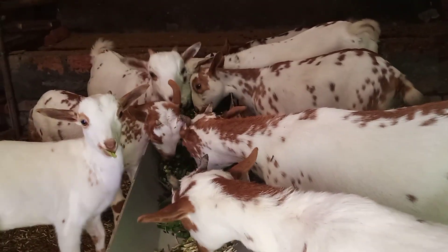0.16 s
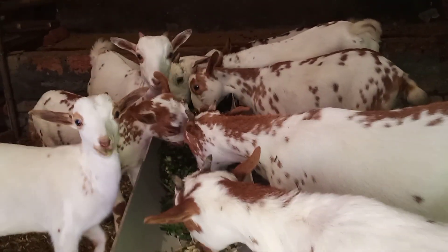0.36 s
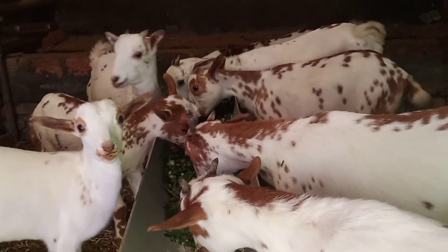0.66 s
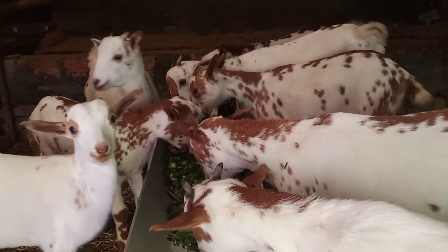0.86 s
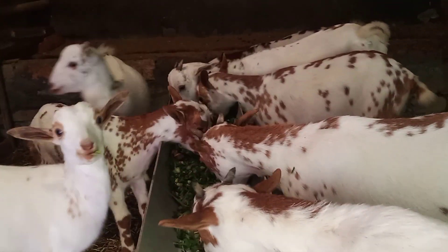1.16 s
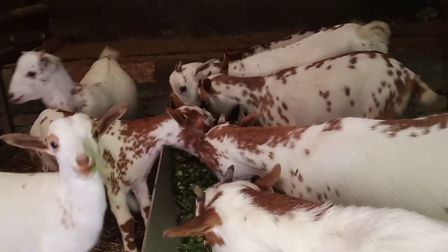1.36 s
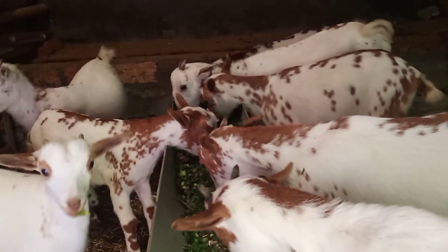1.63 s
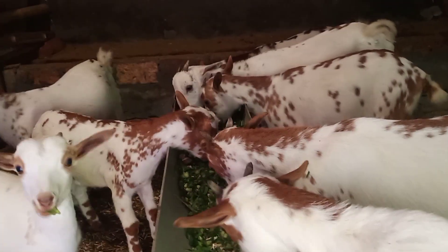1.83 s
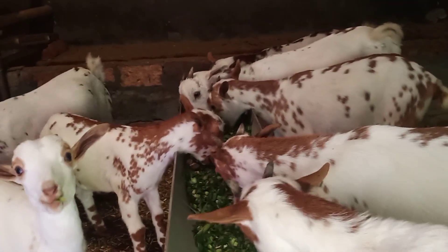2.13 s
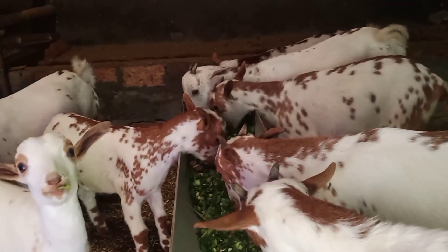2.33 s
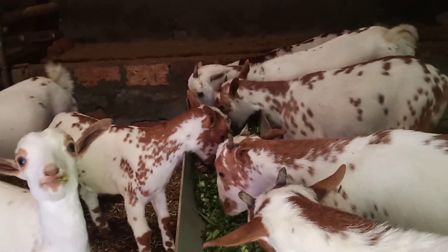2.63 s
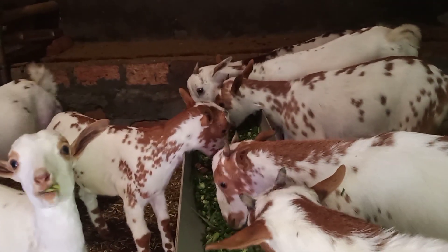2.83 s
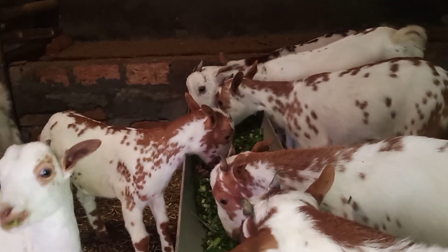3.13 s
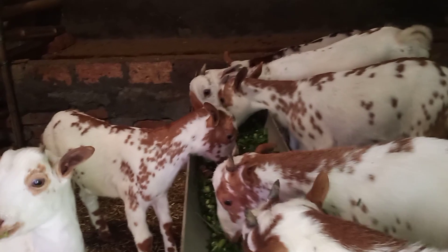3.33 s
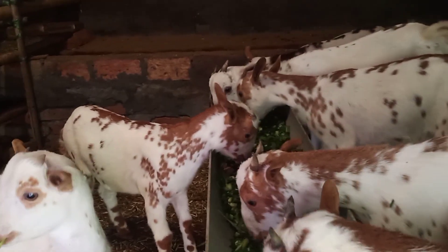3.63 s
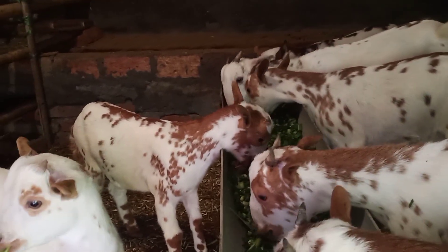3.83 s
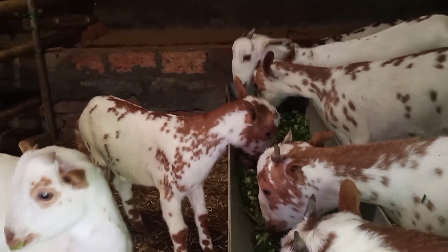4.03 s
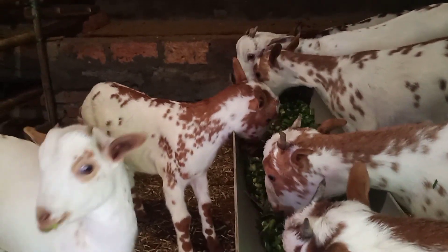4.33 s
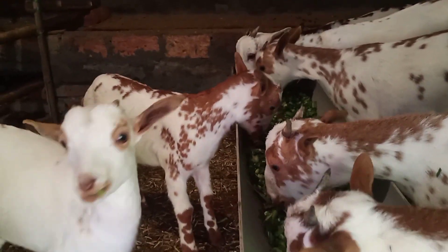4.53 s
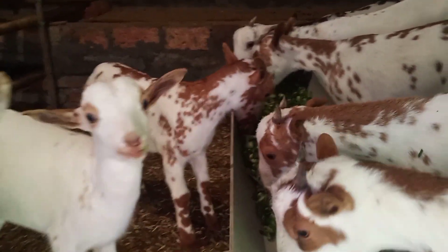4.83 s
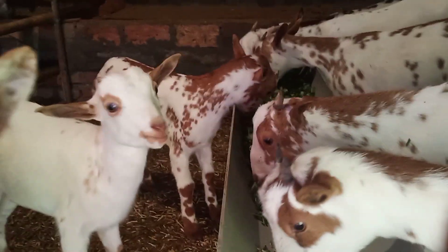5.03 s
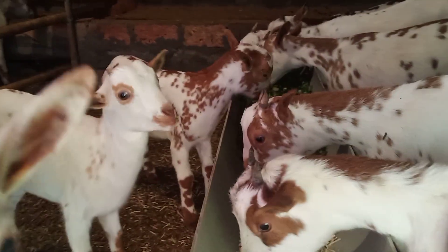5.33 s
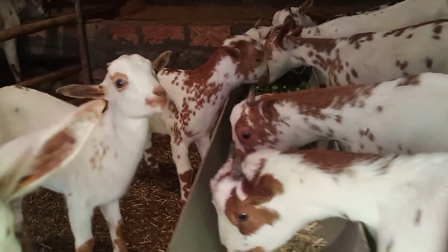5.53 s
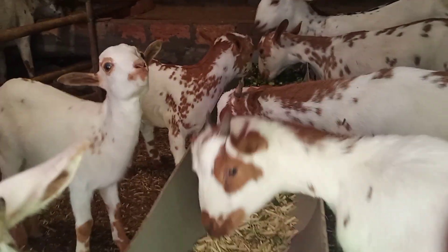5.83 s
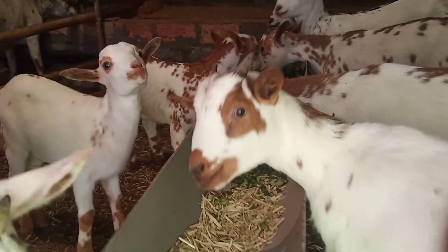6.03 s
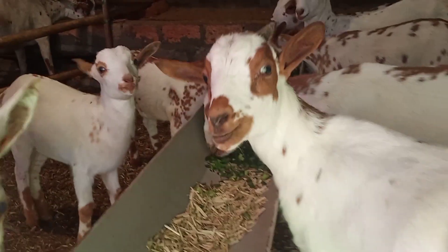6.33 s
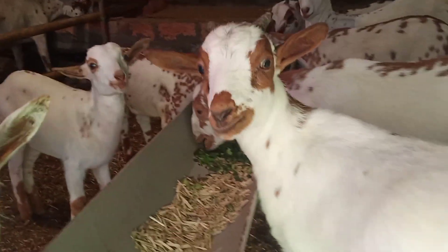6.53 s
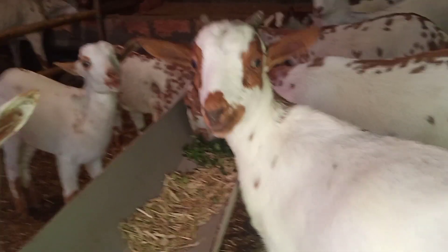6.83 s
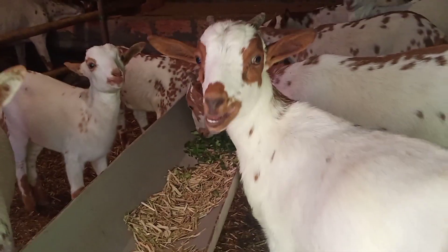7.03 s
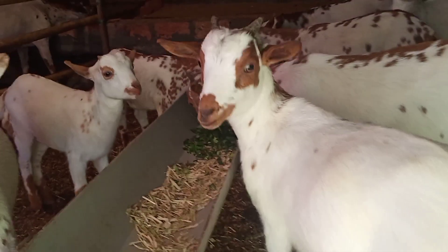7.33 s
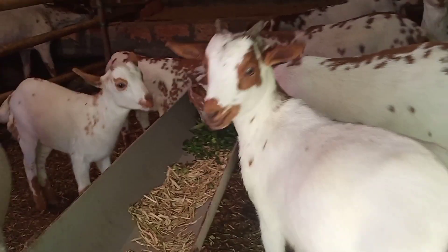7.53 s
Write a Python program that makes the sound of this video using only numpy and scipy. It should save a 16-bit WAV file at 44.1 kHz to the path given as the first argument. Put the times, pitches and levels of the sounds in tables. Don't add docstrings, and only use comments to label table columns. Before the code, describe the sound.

In a brick shed, goats feed at a metal trough. Near sparrows whistle falling chirps throughout, with hoarser and fainter ones between. Fodder hisses and snaps, sharpest near the start, while muzzles and horns scrape and knock the sheet metal in short uneven bouts. A tiny grunt opens it and soft hooves thud. A stereo phone hears feeding close and birds roomy, its noise reduction leaving the background patchy.

```python
import sys
import numpy as np
from scipy import signal
from scipy.fft import rfft, irfft, next_fast_len
from scipy.io import wavfile
from scipy.ndimage import uniform_filter1d

SR = 44100
rng = np.random.default_rng(int(sys.argv[2]) if len(sys.argv) > 2 else 0)


def master_out(mix):
    frames = np.transpose(np.atleast_2d(mix))
    ceiling = np.clip(frames, -1, 1)
    pcm = np.round(ceiling * 32767).astype(np.int16)
    wavfile.write(sys.argv[1], SR, pcm)


def level_to_linear(level):
    exponent = np.asarray(level, float) / 20
    return 10 ** exponent


N = 338247
T = np.arange(N) / SR

# f/Hz, level/dB per Hz
MURMUR_COLOUR = [(18, -47), (30, -5.5), (562, -3), (2140, -14.5), (4110, -7), (4930, -5.5), (6410, -6.5),
                 (9490, -29.5), (15600, -9)]
MURMUR_DB = -81.5
PATCHY_DB = 1.6
# t/s, level/dB
DIPS = [
    (2.23, -10),
    (2.83, -15),
    (3.75, -7.5),
    (4.47, -3),
    (5.69, -6),
    (5.92, -9),
    (6.53, -10.5),
    (7.6, -6.5),
]
DIP_S = 0.11

# start t/s, knee t/s, start f/Hz, knee f/Hz, level/dB
NEAR_CHIRPS = [(-.045, .125, 5300, 4226, -39), (.52, .69, 5304, 4000, -42), (.85, .98, 5300, 4063, -43),
               (1.38, 1.57, 5190, 4420, -43), (1.72, 1.85, 5206, 4350, -44), (2.28, 2.48, 5300, 4120, -40),
               (2.87, 3.08, 4943, 4166, -42), (3.26, 3.37, 4803, 4433, -44.5),
               (3.96, 4.03, 4620, 4283, -40.5), (4.2, 4.33, 5130, 4254, -43),
               (4.85, 5.04, 5034, 3954, -43.5), (5.295, 5.37, 4280, 4050, -47),
               (6.03, 6.18, 4980, 4260, -43)]
# start t/s, knee t/s, start f/Hz, knee f/Hz, level/dB
HOARSE_CHIRPS = [
    (1.95, 2.08, 4014, 3762, -47),
    (2.88, 3.12, 3859, 3710, -49.5),
    (3.43, 3.52, 4303, 3800, -47),
    (5.23, 5.36, 4064, 3662, -47.5),
    (5.71, 5.79, 4137, 4225, -52.5),
    (5.93, 6.07, 4404, 4005, -49),
    (6.6, 6.8, 4220, 3600, -56.5),
    (7.04, 7.14, 4014, 4130, -53),
    (7.63, 7.75, 3920, 4120, -54),
]
# start t/s, knee t/s, start f/Hz, knee f/Hz, level/dB
FAR_CHIRPS = [
    (.28, .45, 4070, 4032, -44),
    (1.45, 1.715, 3830, 3590, -50),
    (2.24, 2.33, 4232, 4284, -44),
    (4.09, 4.245, 4036, 3760, -49.5),
    (5.44, 5.605, 3600, 3400, -48),
]
# start t/s, end t/s, start f/Hz, end f/Hz, level/dB
PEEPS = [
    (3.86, 3.98, 5320, 5120, -61),
    (5.23, 5.33, 5200, 5130, -56.5),
    (6.6, 6.71, 4437, 4340, -54.5),
]
# share of the glide time held on top, share of the glide done midway after it, swell level/dB,
# share of the fall done in the drop, end f/Hz, drop level/dB, end level/dB
NEAR_SONG = (0.2671, 0.65, 7.5, 0.6, 2520, 2, -14.5)
HOARSE_SONG = (0.19, 0.5, 4, 0.3964, 2400.5, 0.5, -23)
FAR_SONG = (0.21, 0.51, 1, 0.52, 2400.5, -1.5, -17)
# f/Hz, level/dB
OCTAVE = [(5000, -18.5), (6200, -8.5), (7000, -22), (8000, -38), (10500, -38.5)]
ATTACK_S, ATTACK_DB, DROP_S, TAIL_S = .025, -15.5, .027, .05
SCOOP = .025
FALL_HZ = 1707
NEAR_BURR, HOARSE_BURR, FAR_BURR = 0.066, 0.35, .025

# peak t/s, rustle level/dB, rise t/s, fade t/s
RUSTLES = [(.03, -75, .1, .45), (.33, -64, 0.074, 0.091), (.44, -40.5, 0.01, 0.1), (.72, -54, 0.086, 0.18),
           (1.08, -57.5, 0.069, 1), (1.2, -59, 0.13, 0.3), (1.63, -70.5, .1, 0.16), (1.75, -67, 0.16, .35),
           (2.03, -69, 0.075, 0.29), (2.4, -62, 0.051, 0.081), (2.53, -74.5, 0.087, .19),
           (2.75, -74.5, .17, 0.079), (3.14, -59.5, 0.051, 0.2), (3.5, -75, 0.17, 0.93),
           (3.65, -69, 0.24, 0.086), (3.89, -73.5, .2, 2.6), (4.22, -64, 0.13, 0.33),
           (4.55, -68, 0.088, 0.083), (4.75, -69, 0.43, 0.11), (4.93, -61.5, 0.13, 0.075),
           (5.05, -59.5, 0.037, 0.23), (5.41, -64.5, 0.071, 0.099), (5.6, -79.5, 0.33, 1.5),
           (6.08, -59, 0.054, 0.14), (6.4, -66, 0.15, .2), (6.83, -58.5, 0.085, 0.062),
           (6.98, -71.5, 0.047, 0.17), (7.08, -69, 0.3, 0.32), (7.31, -60.5, 0.065, 0.21),
           (7.51, -70, 0.11, .1)]
# f/Hz, level/dB per Hz
RUSTLE_COLOUR = [(710, -30.5), (1200, -18.5), (1490, -25), (2460, -12), (3400, -9), (3950, -7),
                 (5110, -5.5), (6610, -3), (8110, -15.5), (15600, -5)]
# t/s, peak level/dB, burst t/s
SNAPS = [(0.292, -50, 0.01), (0.4293, -38.5, 0.017), (0.4549, -37.5, 0.047), (2.634, -59, 0.022),
         (3.3884, -51.5, 0.037), (3.645, -62, 0.0087), (3.8706, -68.5, 0.019), (4.501, -72, 0.017),
         (4.568, -50, 0.0087), (6.798, -48.5, 0.0092), (7.0175, -43.5, 0.033), (7.3036, -63, 0.042),
         (7.5003, -67, 0.034)]
FADE_DB = -32.5

# t/s, pitch f/Hz, level/dB
GRUNT = [
    (0.05, 150.7, -78.5),
    (0.126, 175.3, -66),
    (0.21, 159, -79.5),
]

# peak t/s, scrape level/dB, rise t/s, fade t/s
SCRAPES = [(.252, -39.5, .09, 0.25), (.758, -39.5, .135, 0.33), (1.28, -37.5, 0.093, 0.07),
           (1.908, -41, 0.07, 0.1), (2.65, -38.5, 0.084, 0.068), (3.062, -60, .11, 0.057),
           (3.444, -38.5, 0.055, 0.099), (3.882, -57, .042, 0.16), (4.28, -64, .08, 0.1),
           (4.524, -35.5, 0.028, 0.22), (4.916, -40, .045, 0.28), (5.396, -35.5, 0.08, 0.1),
           (6.1, -69, 0.12, 0.029), (6.828, -40.5, 0.091, 0.062), (7.038, -44.5, 0.017, 0.099)]
# f/Hz, level/dB per Hz
SCRAPE_COLOUR = [(120, -63.5), (200, -26.5), (657, -1), (741, 1), (1160, -3), (1730, -20), (3580, -20),
                 (4970, -28), (5770, -32.5), (7000, -40.5), (9100, -74), (15400, -120)]
# f/Hz, level/dB, 60 dB decay t/s
TROUGH_MODES = [(500, -23.5, 1.6), (796, -5, 0.26), (896, 0.5, 0.94), (987, 8.5, 0.072),
                (1615, -38.5, 0.45), (1850, -29, 4.6)]
# t/s, peak level/dB, ring f/Hz
HORN_BLOWS = [(.159, -32, 900), (.199, -38.5, 525.4), (.235, -33, 1475), (.244, -31, 710), (.429, -31, 800),
              (.446, -24.5, 1020), (.685, -27, 816), (.756, -24.5, 947), (.896, -36, 604),
              (.943, -45.5, 581), (1.275, -23, 763), (1.851, -35.5, 783), (1.919, -23, 900),
              (2.034, -35.5, 1778), (2.619, -36.5, 530), (3.392, -35.5, 735), (3.459, -37, 758),
              (3.654, -56.5, 472), (4.565, -26.5, 615.4), (4.954, -33.5, 916), (4.989, -36, 491),
              (5.379, -34, 1139), (5.748, -57, 646), (6.099, -53, 628), (6.4, -50.5, 431),
              (6.759, -34, 813), (6.815, -27, 801.5), (6.869, -31, 661), (7.02, -38, 963),
              (7.059, -41, 351.7)]
CHATTER_S, CHATTER_DB, CHATTER_HZ, CLIMB = .045, 4.5, 477, 1.17

# t/s, peak level/dB
HOOF_THUDS = [
    (0.884, -53.5),
    (2.461, -65),
    (3.059, -69),
    (3.207, -64),
    (4.901, -60.5),
    (6.951, -76.5),
    (7.268, -70.5),
]

# f/Hz, level/dB
LEFT_PORT = [(30, 4), (4700, 3), (5050, 3), (5400, -1), (15600, 3), (15800, -38)]
# f/Hz, level/dB
RIGHT_PORT = [(30, 5.5), (4700, 1.5), (5050, -2), (5400, 3.5), (8000, 2.5), (11000, -6.5), (15600, -21.5),
              (15800, -62.5)]
PORT_LAG = 22
# f/Hz, level/dB
HUSH = [(30, -125), (1000, -112), (3000, -100), (5000, -98), (8000, -100), (11000, -104), (16000, -120)]


def colour(x, points):
    hz, db = np.transpose(points)
    n = x.shape[-1]
    size = next_fast_len(n)
    bins = np.maximum(np.arange(size // 2 + 1) * SR / size, 1)
    gain = level_to_linear(np.interp(np.log(bins), np.log(hz), db))
    return irfft(rfft(x, size) * gain, size)[..., :n]


def unit(x):
    return x / np.sqrt(np.mean(x ** 2))


def walk(rate):
    k = int(SR / rate)
    held = np.repeat(rng.standard_normal(N // k + 1), k)
    slewed = uniform_filter1d(uniform_filter1d(held, k), k)
    return unit(slewed[:N])


def grains(rate, spread_db):
    struck = rng.random(N) < rate / SR
    return struck * rng.standard_normal(N) * level_to_linear(spread_db * rng.exponential(size=N))


def played(tables, edge_s):
    rows = np.vstack(tables)
    on = sum((T >= t[0][0]) & (T <= t[-1][0]) for t in tables)
    columns = [np.interp(T, rows[:, 0], c) for c in rows.T[1:]]
    return columns, uniform_filter1d(1. * (on > 0), int(edge_s * SR))


def swells(rows, entry_db, lead, floor_db):
    t = T[::64]
    each = []
    for s, db, rise, fade in rows:
        times = [s - (1 + lead) * rise, s - rise, s, s + 2 * fade]
        levels = [db + 2 * entry_db, db + entry_db, db, db + 2 * FADE_DB]
        each.append(np.interp(t, times, levels, floor_db, floor_db))
    return np.interp(T, t, np.maximum(np.max(each, axis=0), floor_db))


def room(x, t60, wet_db):
    t = np.arange(int(.5 * SR)) / SR
    mid, side = rng.standard_normal((2, len(t))) * level_to_linear(-60 * t / t60) * (t > .004)
    side = colour(side, [(30, -24.5), (200, -19.5), (700, -4.5), (16000, 2.5)])
    tails = np.array([mid + side, mid - side]) * level_to_linear(wet_db) / np.sqrt(2 * np.sum(mid ** 2))
    tails[0, PORT_LAG] += 1
    tails[1, 0] += 1
    return signal.fftconvolve(x[None], tails, axes=1)[:, :N]


def shed():
    mid, side = colour(rng.standard_normal((2, N)), MURMUR_COLOUR)
    side = colour(side, [(30, -16.0), (150, -9.5), (500, -5), (16000, 1.0)])
    dips = sum(db * np.maximum(1 - np.abs(T - s) / DIP_S, 0) for s, db in DIPS)
    patchy = level_to_linear(MURMUR_DB + 5.5 + PATCHY_DB * walk(8.3) + dips)
    return patchy * np.array([mid + side, mid - side]) / np.std(mid)


def chirp(rows, song):
    hold, bow, swell_db, drop, end_hz, drop_db, end_db = song
    out = []
    for start, knee, top_hz, knee_hz, db in rows:
        held = start + ATTACK_S + hold * (knee - start - ATTACK_S)
        deep = (knee_hz - end_hz) / FALL_HZ
        out.append([
            (start, top_hz * (1 - SCOOP), db - swell_db + ATTACK_DB),
            (start + ATTACK_S, top_hz, db - swell_db),
            (held, top_hz, db - swell_db),
            ((held + knee) / 2, top_hz + bow * (knee_hz - top_hz), db - 0.19 * swell_db),
            (knee, knee_hz, db),
            (knee + deep * DROP_S, knee_hz + drop * (end_hz - knee_hz), db + drop_db),
            (knee + deep * (DROP_S + TAIL_S), end_hz, db + end_db)])
    return out


def sparrow(tables, burr, burr_hz, wobble):
    (hz, db), on = played(tables, 0.017)
    hoarse = np.interp(hz, [2705, 3600, 4800, 5300], [9.0, 1, 1.2, 4])
    flutter = 2 * np.pi * np.cumsum(burr_hz * (1 + 0.22 * walk(60))) / SR
    phase = 2 * np.pi * np.cumsum(hz * (1 + wobble * hoarse * walk(250))) / SR
    octave = level_to_linear(np.interp(2 * hz, *np.transpose(OCTAVE))) * np.sin(2 * phase)
    lines = np.sin(phase) + 2 * burr * np.sin(phase + flutter) + 0.14 * burr * np.sin(phase - flutter)
    breath = level_to_linear(db + 1.92 * walk(70) + 1.5 * walk(300))
    return np.sqrt(2) * on * breath * (lines + octave)


def rafters():
    peeps = [rows[:5] for rows in chirp(PEEPS, FAR_SONG)]
    near = sparrow(chirp(NEAR_CHIRPS, NEAR_SONG), NEAR_BURR, 320, 0.0047)
    hoarse = sparrow(chirp(HOARSE_CHIRPS, HOARSE_SONG), HOARSE_BURR, 320, .004)
    far = sparrow(sorted(chirp(FAR_CHIRPS, FAR_SONG) + peeps), FAR_BURR, 330, 0.0024)
    return near + hoarse + far


def fodder():
    db = swells(RUSTLES, entry_db=-18, lead=1, floor_db=-98) + 1.5 * walk(70)
    crackle = unit(grains(2500, 2.5))
    hiss = unit(colour(rng.standard_normal(N) + 3.6 * crackle, RUSTLE_COLOUR))
    thin = colour(hiss, [(7000, -31), (10500, -24), (14500, -3.5)])
    fullness = level_to_linear(0.21 * np.minimum(db + 52.5, 0))
    rustle = level_to_linear(db + 6.0) * (thin + fullness * (hiss - thin))
    burst = sum(level_to_linear(peak) * (T > s) * np.exp(-np.abs(T - s) / max(d, .003)) for s, peak, d in SNAPS)
    crack = colour(rng.standard_normal(N), [(500, -14.5), (2000, -1.0), (4000, 9.0), (7000, -7.5),
                                            (10000, -13.5), (15000, -22.5)])
    return rustle + level_to_linear(-4.5) * burst * unit(crack)


def goat():
    (hz, db), on = played([GRUNT], .03)
    phase = 2 * np.pi * np.cumsum(hz * (1 + .01 * walk(60))) / SR
    return on * level_to_linear(db) * (np.sin(phase) + 0.76 * np.sin(2 * phase) + .3 * np.sin(3 * phase))


def knocks(blows):
    out = np.zeros(N + SR)
    t = np.arange(SR // 3) / SR
    for (s, db, f), (a, b, c) in zip(blows, rng.random((len(blows), 3))):
        pair = np.sin(2 * np.pi * f * t) + 0.75 * np.sin(2 * np.pi * f * (1.05 + 0.054 * a) * t)
        upper = 0.38 * np.sin(2 * np.pi * f * (1.4 + .5 * b) * t) * level_to_linear(-60 * t / 0.038)
        t60 = (.1 + .08 * c) * min(1, 900 / f)
        attack = np.minimum(t / 0.0031, 1)
        out[int(s * SR):][:len(t)] += level_to_linear(db) * attack * (pair * level_to_linear(-60 * t / t60) + upper)
    return out[:N]


def chatter(scrape_db, count):
    step = np.arange(count)
    rows = []
    for (s, _, rise, _), (a, b) in zip(SCRAPES, rng.standard_normal((len(SCRAPES), 2, count))):
        at = s - .7 * rise + CHATTER_S * (step + .2 * a)
        level = np.interp(at, T, scrape_db) + CHATTER_DB + 4.6 * b
        rows += zip(at, level, CHATTER_HZ * CLIMB ** (step + .6 * a))
    return rows


def trough():
    db = swells(SCRAPES, entry_db=-13.5, lead=0.1, floor_db=-120)
    ticks = level_to_linear(db) * unit(np.clip(unit(grains(250, 3.0)), -24, 24))
    t = np.arange(SR // 3) / SR
    ring = sum(level_to_linear(g) * np.sin(2 * np.pi * f * t) * level_to_linear(-60 * t / min(d, .25)) for f, g, d in TROUGH_MODES)
    modes = signal.fftconvolve(ticks, ring / np.sqrt(np.sum(ring ** 2)))[:N]
    stutter = level_to_linear(8.3 * np.tanh(walk(80)))
    rub = unit(colour(stutter * rng.standard_normal(N), SCRAPE_COLOUR))
    blows = knocks(HORN_BLOWS + chatter(db, count=4))
    sheet = level_to_linear(-11.0) * modes + level_to_linear(db - 6.0) * rub + level_to_linear(-7.0) * blows
    return colour(sheet, [(30, -49), (200, -11.5), (320, -2.0), (16000, 1.5)])


def hooves():
    push = sum(level_to_linear(db) * np.maximum(T - s, 0) / 0.041 * np.exp(1 - np.abs(T - s) / 0.019)
               for s, db in HOOF_THUDS)
    straw = colour(rng.standard_normal(N), [(30, -18.5), (65, -1.5), (170, -3.0), (300, -24), (900, -77.5)])
    return level_to_linear(-2.0) * push * unit(straw)


def scene():
    birds = room(level_to_linear(-2.0) * rafters(), 0.2, 4.36)
    feeding = room(fodder(), 0.033, 3.5) + room(trough(), 0.14, 1.0)
    return shed() + birds + feeding + goat() + hooves()


def band_limit(x):
    return signal.sosfilt(signal.butter(12, 16270, fs=SR, output="sos"), x)


def record(dry):
    ports = np.array([colour(dry[0], LEFT_PORT), colour(dry[1], RIGHT_PORT)])
    hz, _, cells = signal.stft(ports, SR, nperseg=512)
    power = np.mean(np.abs(cells) ** 2, axis=0)
    power = uniform_filter1d(uniform_filter1d(power, size=4, axis=0), size=2, axis=1)
    wander = uniform_filter1d(rng.standard_normal(power.shape), size=6, axis=0)
    wander = unit(uniform_filter1d(wander, size=9, axis=1))
    hush = level_to_linear(2 * np.interp(hz, *np.transpose(HUSH)))[:, None] * level_to_linear(9.0 * wander)
    gain = level_to_linear(-15) + power ** 2 / (power ** 2 + hush ** 2)
    quiet = signal.istft(cells * gain, SR, nperseg=512)[1]
    return band_limit(quiet[:, :N])


dry = scene()
out = record(dry)
master_out(out)
```